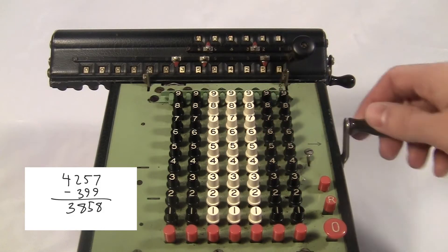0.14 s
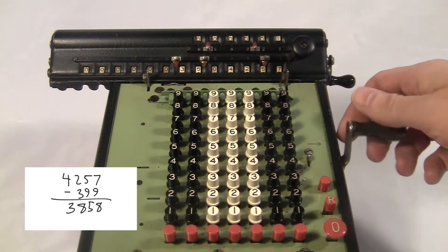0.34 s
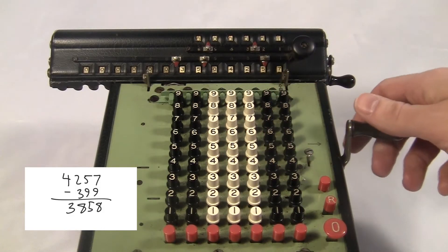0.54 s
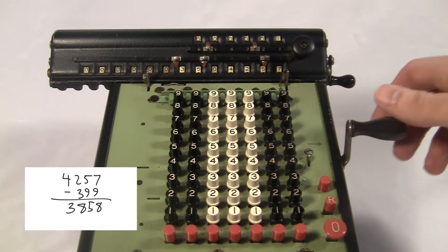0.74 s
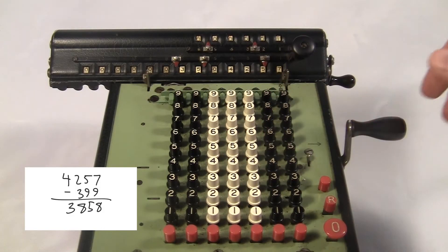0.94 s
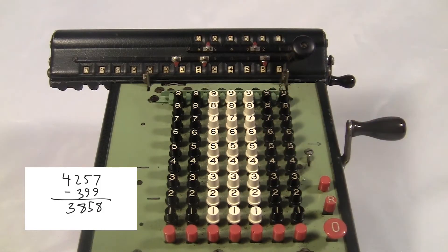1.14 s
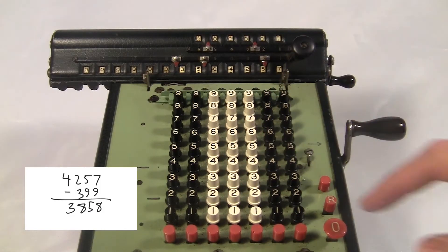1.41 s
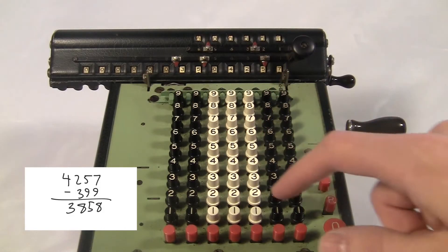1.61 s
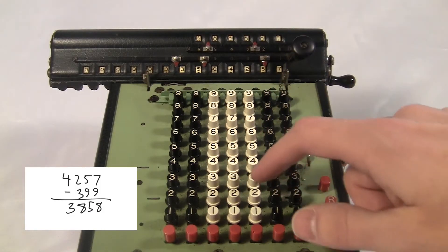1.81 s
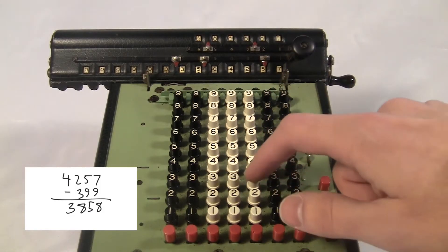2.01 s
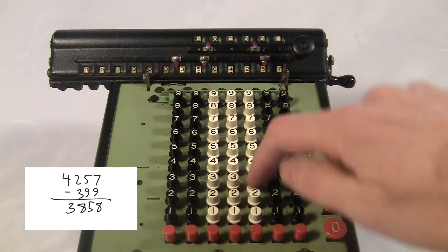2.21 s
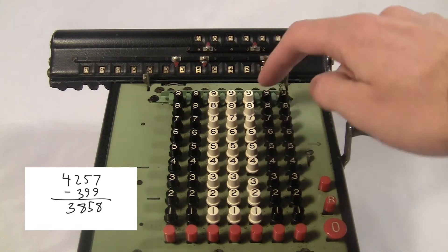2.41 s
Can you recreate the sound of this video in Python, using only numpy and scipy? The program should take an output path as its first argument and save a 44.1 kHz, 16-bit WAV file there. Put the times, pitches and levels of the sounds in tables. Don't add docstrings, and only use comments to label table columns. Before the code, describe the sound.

Metal gears and loose parts of a crank calculating machine clatter for half a second, then faint room hiss and rumble, then a light finger brush and a crisp key press with a small bounce, heard close indoors.

```python
import sys
import numpy as np
from scipy import signal
from scipy.io import wavfile

SR = 44100
rng = np.random.default_rng(int(sys.argv[2]) if len(sys.argv) > 2 else 0)


def master(y):
    cut = np.clip(np.atleast_2d(y).T, -1, 1)
    pcm = np.round(cut * 32767)
    wavfile.write(sys.argv[1], SR, pcm.astype(np.int16))


def boost_factor(decibels):
    exponent = np.asarray(decibels, float) / 20
    return 10 ** exponent


N = 112454


def rms_one(x):
    return x / np.sqrt(np.mean(x ** 2) + 1e-20)


def at_hz(points, hz):
    points = np.array(points)
    return np.interp(np.log(hz), np.log(points[:, 0]), points[:, 1])


def filtered(x, order, hz, kind="low"):
    return signal.sosfilt(signal.butter(order, hz, kind, fs=SR, output="sos"), x)


def ring(drive, hz, t60):
    shrink = boost_factor(-60 / (t60 * SR))
    turn = 2 * np.pi * hz / SR
    tiny = 1e-18
    return signal.lfilter([.5, 0, -.5], [1, -2 * shrink * np.cos(turn), shrink ** 2], drive + tiny)


def grit(per_s, uneven_db):
    sizes = boost_factor(uneven_db * np.minimum(rng.exponential(1, N), 4)) * rng.choice([-1, 1], N)
    happens = rng.random(N) < per_s / SR
    return rms_one(sizes * happens)


def strike(rows, modes, spread_db, ring_db, rattle_db, rattle_t60, steady):
    t = np.arange(9000) / SR
    clicks = grit(9000, uneven_db=2.0)
    loose = rng.standard_normal((len(rows), len(t)))
    luck = rng.normal(0, 1, (len(rows), len(modes)))
    drives = np.tile(steady, (len(modes), 1))
    cracks = np.zeros(N)
    hz = np.array(modes)[:, 0]
    rattle_rise_s = 0.00087

    for k, (s, db, centre_hz, chatter_s, width_oct) in enumerate(rows):
        at = int(s * SR) + np.arange(len(t))
        burst = clicks[k * 2500:][:len(t)] * np.exp(-t / max(chatter_s, .0002))
        burst[0] = 2 * np.sign(luck[k, 0])
        burst = burst / np.sqrt(np.sum(burst ** 2))

        fade = boost_factor(rattle_db - 33.5 - 60 * t / rattle_t60)
        rattle = loose[k] * fade * (1 - np.exp(-t / rattle_rise_s))
        edges = centre_hz * 2. ** np.array([-width_oct, width_oct])
        even_out = np.sqrt(SR / np.ptp(edges))
        cracks[at] += boost_factor(db) * even_out * filtered(burst + rattle, 3, edges, "band")

        far_db = 6.9 * (np.log2(hz / centre_hz) / width_oct) ** 2
        drives[:, at] += np.outer(boost_factor(db + spread_db * luck[k] - far_db), burst)

    rung = sum(boost_factor(db) * ring(drive, f, t60) for drive, (f, db, t60) in zip(drives, modes))
    return cracks + boost_factor(ring_db) * rung


# time in seconds, level in dB.
GEAR_DRIVE = [
    (0, -37),
    (.11, -45.5),
    (.16, -32),
    (.23, -29),
    (.32, -50.5),
    (.38, -45.5),
    (.46, -42),
    (0.538, -58),
    (.6, -74),
]


def gears():
    s, db = np.transpose(GEAR_DRIVE)
    push = boost_factor(np.interp(np.arange(N) / SR, s, db) - 29.0)
    return push * grit(2700, uneven_db=3.5)


# start in seconds, level in dB, centre pitch in Hz,
# chatter time in seconds, width in octaves.
CASE_BLOWS = [(.003, -29, 1480, .006, .25), (.002, -37, 420, 0.0046, 0.41), (.020, -23, 2360, 0.0021, .6),
              (.021, -46, 500, 0.0035, 1.2), (.0262, -24, 425, 0.00015, 0.55),
              (.046, -47, 1400, 0.0029, 0.29), (.066, -38, 1100, .005, 0.8),
              (.0875, -28, 980, 0.0048, 0.19), (.092, -27.5, 1500, 0.0076, 0.91),
              (.1243, -5, 950, .0003, 0.53), (.126, -9.5, 1450, 0.00034, 0.39),
              (.1277, -4.5, 1900, 0.00014, .7), (.1255, -5.5, 905, 0.00023, .12),
              (.130, -18, 147, 0.016, 0.85), (.1413, -15.5, 1400, 0.0012, 1.1),
              (.133, -19, 1800, .004, 0.13), (.152, -21, 1030, .003, .12), (.143, -18.5, 1480, 0.0038, .2),
              (.178, -25, 1800, 0.0051, 0.34), (.200, -13, 394, 0.0038, 0.22),
              (.223, -12, 1450, 0.0015, 0.19), (.229, -19, 1300, 0.009, 0.4),
              (.230, -24.5, 600, 0.0081, 0.61), (.372, -29.5, 1310, 0.035, 0.61),
              (.386, -31.5, 398, 0.0046, 0.53), (.417, -18.5, 2600, 0.023, 1.52),
              (.418, -23, 415, 0.0044, 0.49), (.424, -25, 1470, 0.0021, 0.5),
              (.4335, -16, 1390, 0.0032, 0.27), (.4328, -19.5, 3020, 0.0032, 0.6),
              (.436, -18, 397, 0.0078, 0.22), (.478, -37, 385, .003, 0.28),
              (.506, -33.5, 320, 0.0026, 0.43), (1.111, -49.5, 293, 0.00037, 0.53),
              (1.202, -42, 497, 0.0035, 1.07), (2.222, -17.5, 138.5, 0.0052, 0.92),
              (2.303, -25.5, 245, 0.0014, 0.65)]
# pitch in Hz, level in dB, time to fall 60 dB in seconds.
CASE_TONES = [(132, 0.5, 0.078), (256, -10.5, 0.083), (400, -2.5, 0.087), (470, -12, 0.066),
              (600, 4, 0.027), (667, -10.5, 0.12), (911.1, 1, 0.1), (1030, -7, 0.038), (1263, -7.5, 0.049),
              (1459, -9, .07), (1530, -3, .016), (1617, -11, 0.1), (1794, -13.5, 0.094), (2260, -2, 0.014)]


def case(teeth):
    rung = strike(CASE_BLOWS, CASE_TONES, spread_db=2.84, ring_db=-7.5,
                  rattle_db=4, rattle_t60=0.32, steady=boost_factor(1) * teeth)
    return filtered(rung, 2, 4500)


# start in seconds, level in dB,
# centre pitch in Hz, chatter time in seconds.
STEEL_TICKS = [(.003, -29, 7000, 0.0046), (.018, -27, 8040, 0.0064), (.034, -32, 7000, 0.0075),
               (0.066, -32.5, 6000, 0.0048), (0.088, -31.5, 7540, 0.006), (0.1164, -15, 8250, 0.017),
               (0.1263, -24.5, 4500, 0.0011), (0.135, -19, 7600, 0.0082), (0.184, -22.5, 8300, 0.0084),
               (0.199, -27.5, 7860, 0.005), (.208, -21, 7200, 0.0095), (0.2222, -19.5, 4500, 0.0048),
               (0.361, -42.5, 7360, 0.005), (.381, -31.5, 7300, 0.0037), (.395, -34.5, 4440, 0.0026),
               (0.4167, -25, 8050, 0.012), (0.4185, -14.5, 8000, 0.014), (.433, -24.5, 3370, 0.007),
               (.503, -36.5, 8100, 0.0035), (2.016, -65.5, 3000, .003), (2.045, -48.5, 4270, 0.003),
               (2.047, -50, 9500, 0.0027), (2.064, -52, 3300, 0.0029), (2.092, -48.5, 5700, 0.0037),
               (2.188, -47.5, 5750, 0.009), (2.199, -40.5, 7000, 0.0066), (2.211, -30.5, 7600, .003),
               (2.2197, -13.5, 5600, 0.0015), (2.3008, -21.5, 8000, 0.0036)]
# pitch in Hz, level in dB.
STEEL_BRIGHTNESS = [(2500, 5), (3400, 4.5), (4600, -1.5), (5700, -22.5), (7500, 4), (9400, -4.5),
                    (11000, -24.5), (12800, -7)]


def steel(teeth):
    hz = np.geomspace(2400, 12500, num=40) * rng.uniform(.99, 1.01, 40)
    t60 = .018 * rng.uniform(.7, 1.6, size=40)
    modes = np.transpose([hz, at_hz(STEEL_BRIGHTNESS, hz), t60])
    ticks = [(*row, 0.98) for row in STEEL_TICKS]
    rung = strike(ticks, modes, spread_db=2.0, ring_db=-23,
                  rattle_db=-1.5, rattle_t60=0.17, steady=boost_factor(-8) * teeth)
    rung = rung + boost_factor(14.5) * filtered(teeth, 1, [900, 7000], "band")
    dip_hz, dip_width_hz = 6100, 360
    dip = filtered(rung, 1, [dip_hz - dip_width_hz / 2, dip_hz + dip_width_hz / 2], "band")
    return boost_factor(6.5) * (rung - 0.52 * dip)


def room(x):
    t = np.arange(SR // 2) / SR
    gap_s, low_t60, treble_t60 = 0.0043, 0.47, 0.39
    build = np.clip(t / gap_s, 0, 1) ** 2
    low, high = rng.standard_normal((2, 2, len(t))) * build
    low = filtered(low, 2, 2500) * boost_factor(-15.5 - 60 * t / low_t60)
    high = filtered(high, 2, 2500, "high") * boost_factor(-23 - 60 * t / treble_t60)
    mid, side = signal.fftconvolve(x[None], 0.038 * (low + high), axes=1)[:, :N]
    return mid + 0.17 * side * np.array([[1], [-1]])


# pitch in Hz, level in dB per Hz.
AIR_COLOUR = [(24, -31), (40, 4), (170, -4), (224, -1.5), (496, -7), (1520, -20), (8000, -34.5),
              (15500, -43)]
# pitch in Hz, likeness (1 is the same, 0 is unrelated).
AIR_LIKENESS = [(40, 1), (300, 0.68), (2000, 0.1), (8000, 0.23), (13000, 0.048)]


def air():
    out = 0
    edges = 36 * 2 ** np.arange(0, 9.1, .5)
    white = rng.standard_normal((3, 2, N))
    for k, (low, high) in enumerate(zip(edges, edges[1:])):
        mid, side = filtered(white[k % 2], 2, [low, high], "band")
        hz = np.sqrt(low * high)
        alike = at_hz(AIR_LIKENESS, hz)
        both = np.sqrt(1 + alike) * mid + np.sqrt(1 - alike) * side * [[1], [-1]]
        out = out + boost_factor(at_hz(AIR_COLOUR, hz)) * both
    out = filtered(out, 4, 38, "high")
    boom_hz, boom_width_hz = 241, 40
    boom = ring(white[2, 0], boom_hz, 2.6 / boom_width_hz)
    return boost_factor(-53) * rms_one(out) + boost_factor(-58.5) * rms_one(boom)


# start in seconds, level in dB,
# centre pitch in Hz, chatter time in seconds, width in octaves.
KEY_TOUCHES = [(2.046, -41.5, 1800, 0.0039, .5), (2.199, -26, 2187, 0.0019, 0.5),
               (2.2185, -44, 7400, 0.0016, .6), (2.2201, -17.5, 1210, .0004, 0.47),
               (2.2204, -11, 8500, 0.00039, 1.1), (2.2215, -9.5, 4420, 0.0014, 0.49),
               (2.2222, -9, 1577, 0.00025, 0.51), (2.2235, -32, 9300, 0.0022, 0.7),
               (2.2295, -18.5, 2364, .003, 1.15), (2.232, -22.5, 8980, 0.0024, .6),
               (2.2335, -22.5, 1540, 0.0015, 0.45), (2.2205, -21, 2320, .001, 0.21),
               (2.236, -27, 400, .012, .5), (2.274, -34, 1680, 0.007, 0.4),
               (2.301, -25.5, 2000, 0.0078, 0.78)]
# pitch in Hz, level in dB, time to fall 60 dB in seconds.
KEY_TONES = [(1000, 7, 0.025), (1314, -21, 0.038), (1550, -3, .018), (1800, -0.5, 0.011), (2150, -6, 0.039),
             (2410, -27.5, 0.073), (3147, -1.5, .025), (3680, -19, .03), (4770, -3, 0.01),
             (4955, -9, 0.022), (6500, 1.5, 0.029), (9010, 5, 0.021), (9460, -2, 0.014), (10650, -1, 0.017)]


def key():
    return strike(KEY_TOUCHES, KEY_TONES, spread_db=2.9, ring_db=-10.5,
                  rattle_db=3, rattle_t60=0.2, steady=np.zeros(N))


def scene():
    teeth = gears()
    machine = case(teeth) + steel(teeth) + key()
    machine = filtered(machine, 3, 113, "high")
    machine = filtered(machine, 10, 11100)
    port_lag_s = 0.000238
    late = np.interp(np.arange(N) - port_lag_s * SR, np.arange(N), machine)
    apart = boost_factor(2.5) * filtered(late, 4, 11300, "high")
    direct = machine * boost_factor(0.68 * np.array([[1], [-1]]))
    return direct + apart * [[-1], [1]] + room(machine) + air()


def low_pass(x):
    return signal.sosfilt(signal.butter(12, 15770, fs=SR, output="sos"), x)


def record(dry):
    limit = .95
    rounded = limit * np.tanh(dry / limit) + 0.16 * dry
    mix = signal.sosfilt(signal.cheby2(12, 70, 15900, fs=SR, output="sos"), rounded)
    return low_pass(mix)


dry = scene()
out = record(dry)
master(out)
```